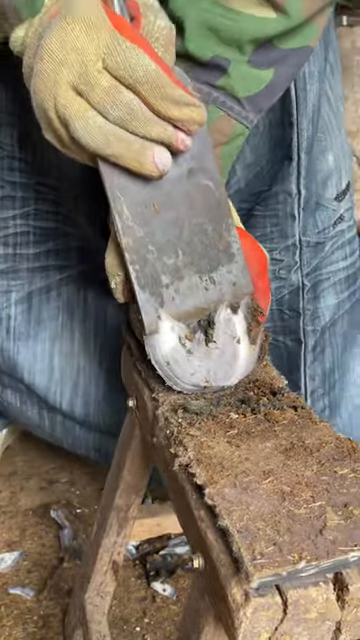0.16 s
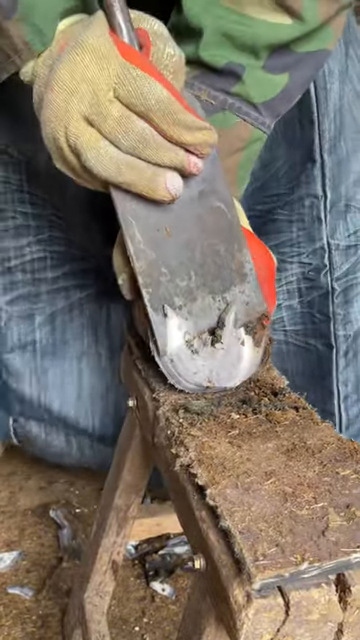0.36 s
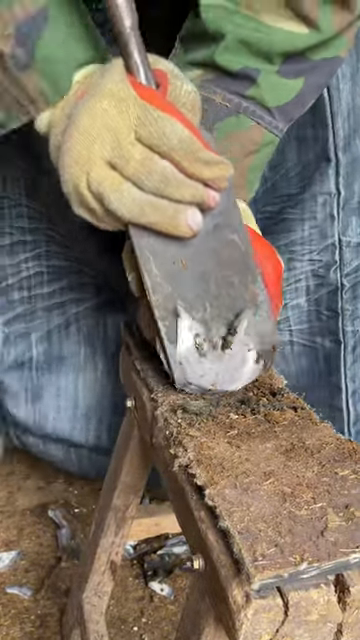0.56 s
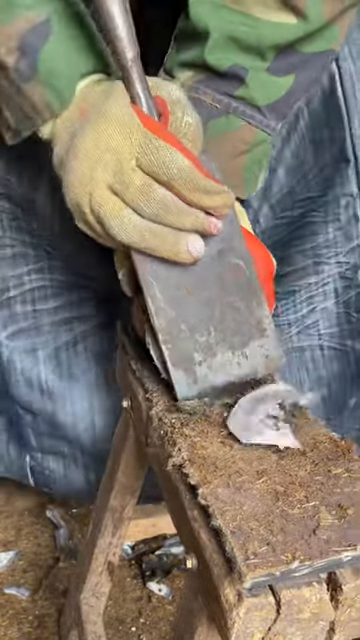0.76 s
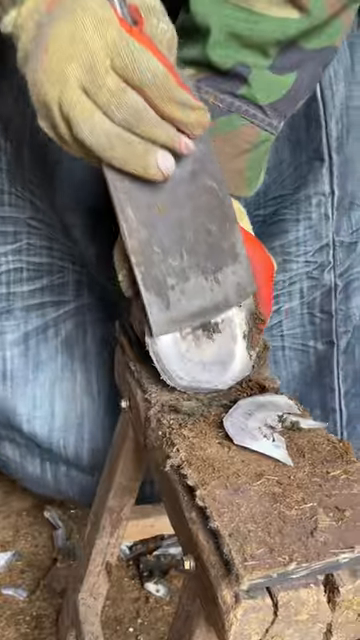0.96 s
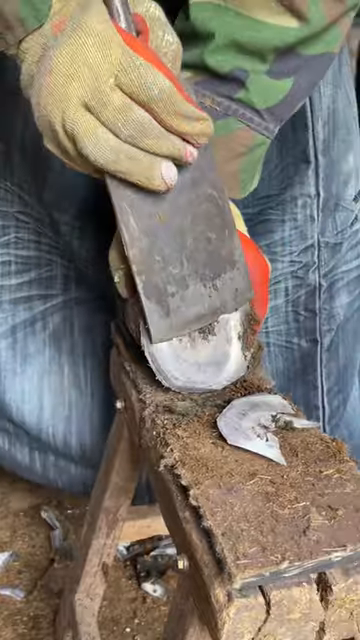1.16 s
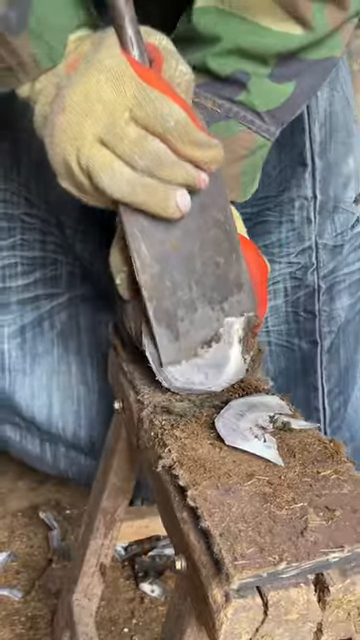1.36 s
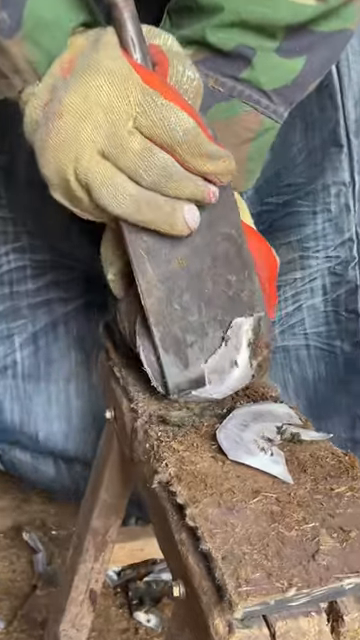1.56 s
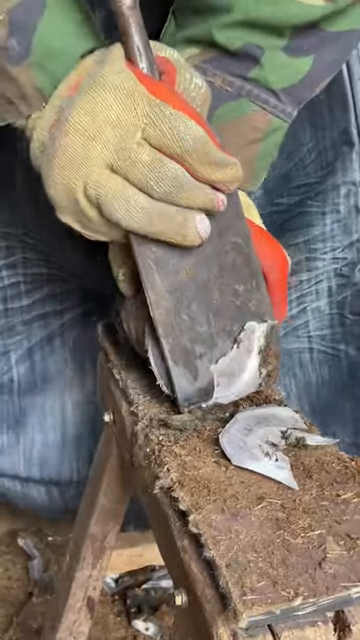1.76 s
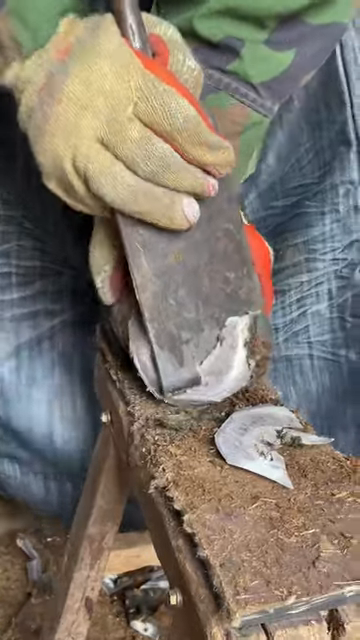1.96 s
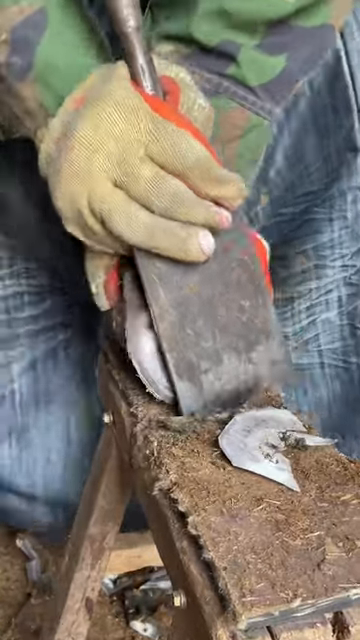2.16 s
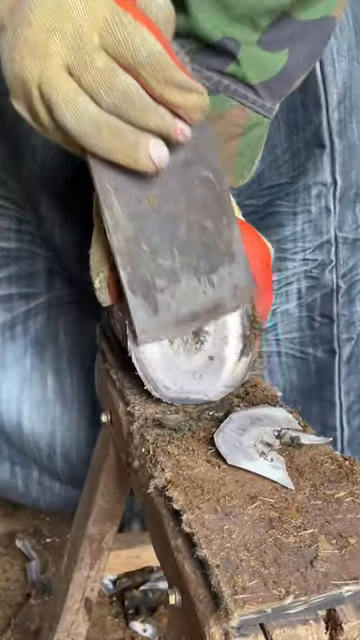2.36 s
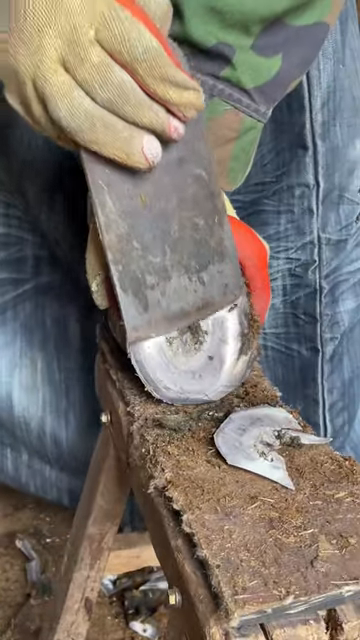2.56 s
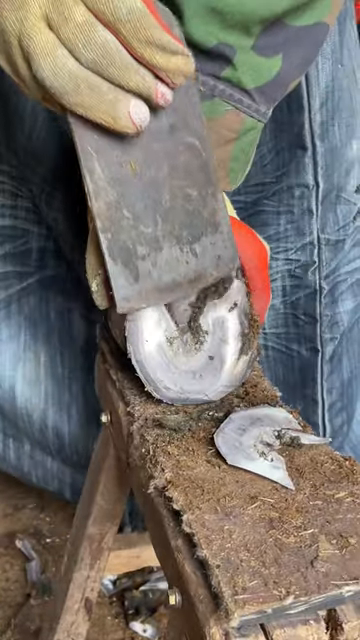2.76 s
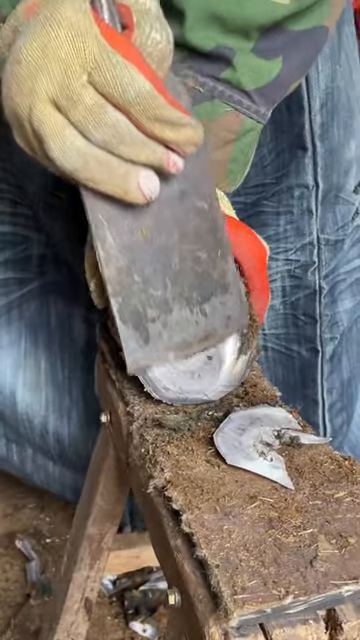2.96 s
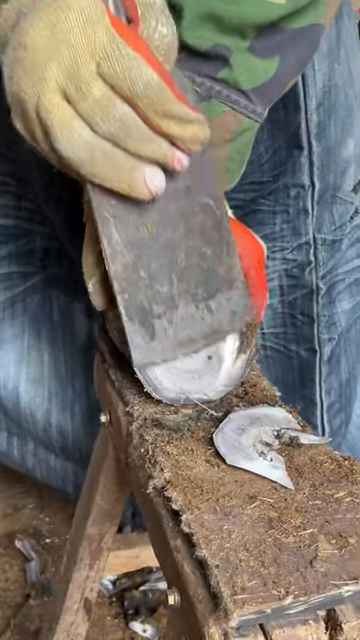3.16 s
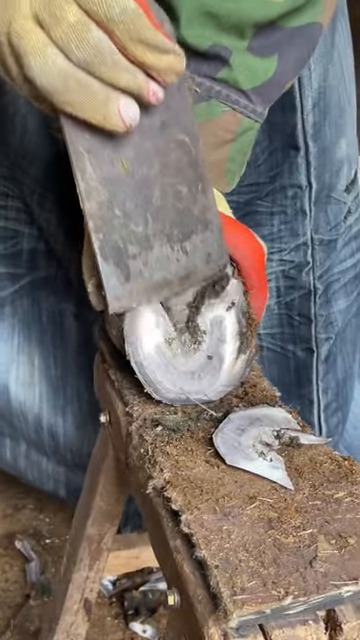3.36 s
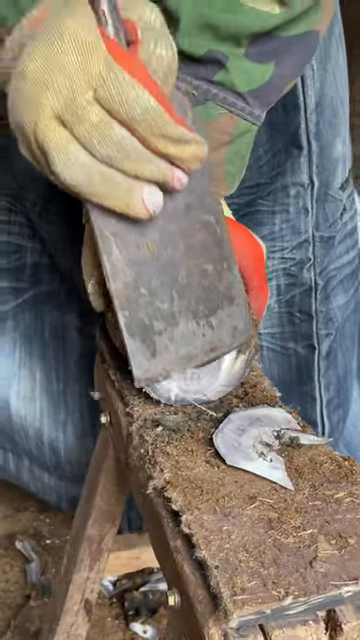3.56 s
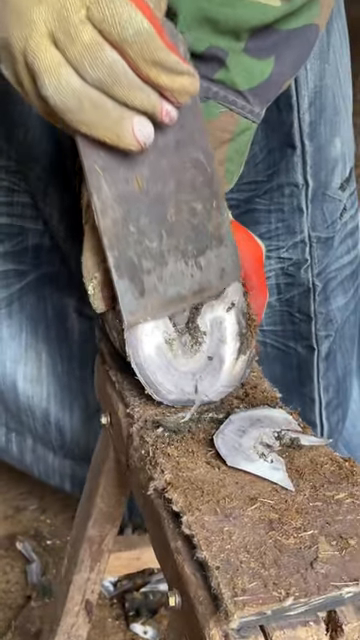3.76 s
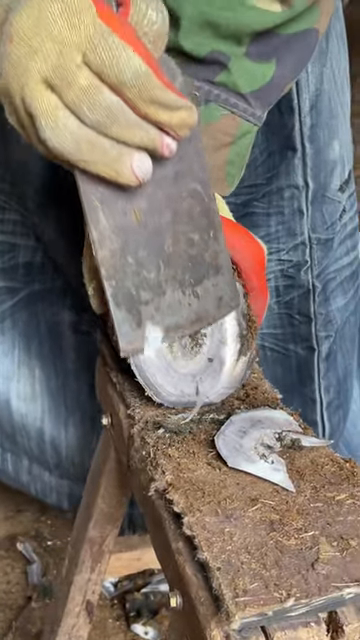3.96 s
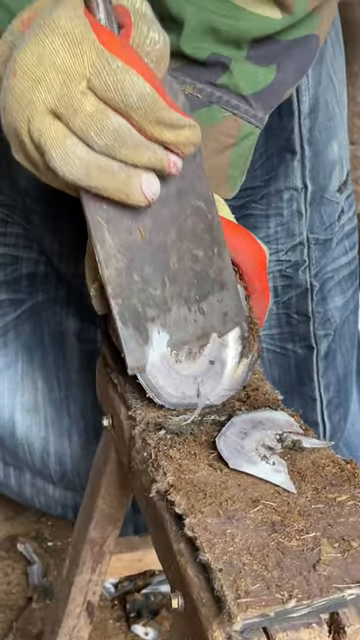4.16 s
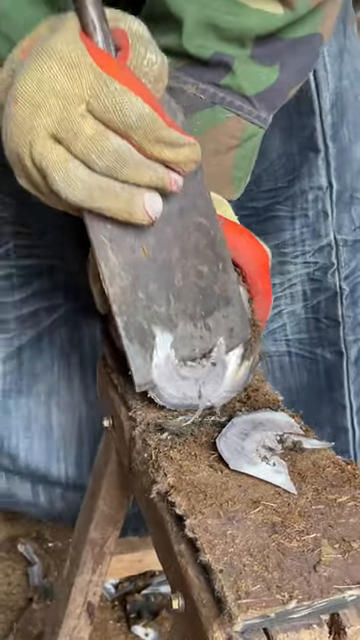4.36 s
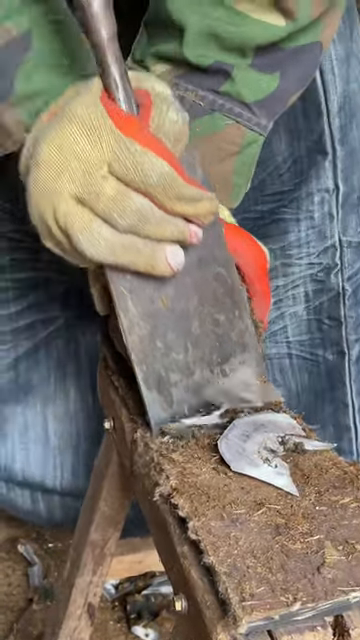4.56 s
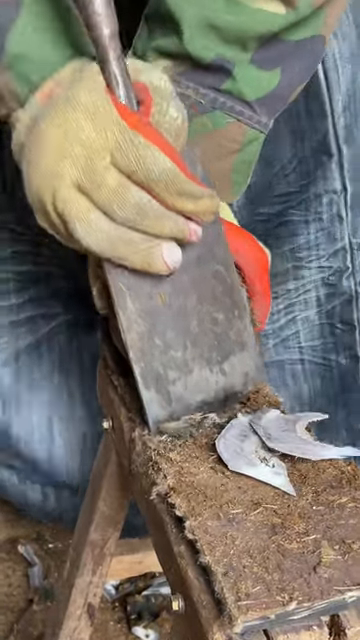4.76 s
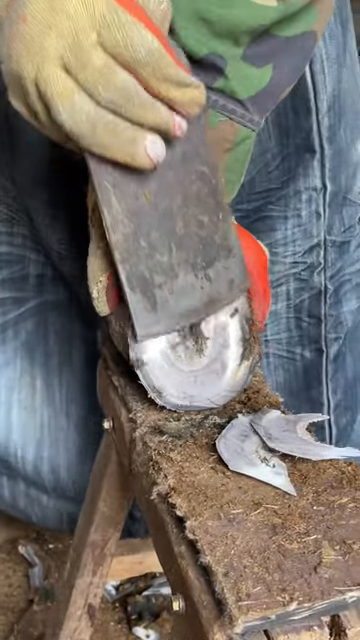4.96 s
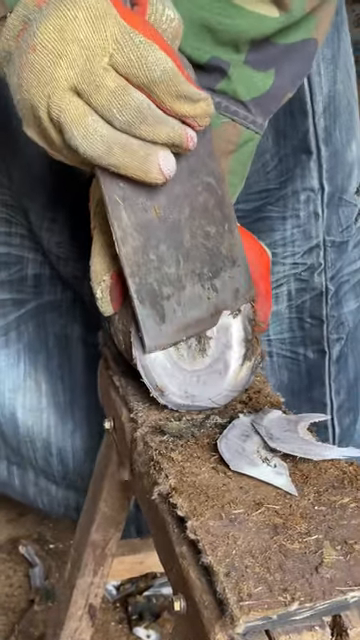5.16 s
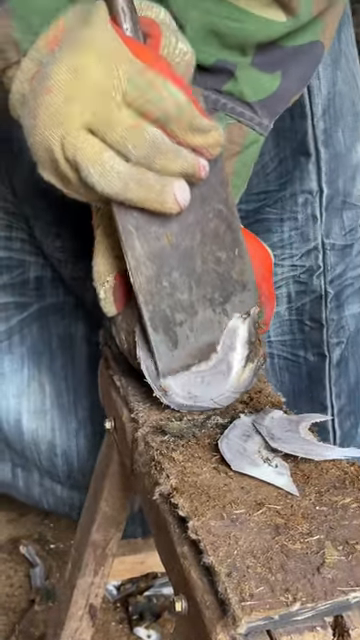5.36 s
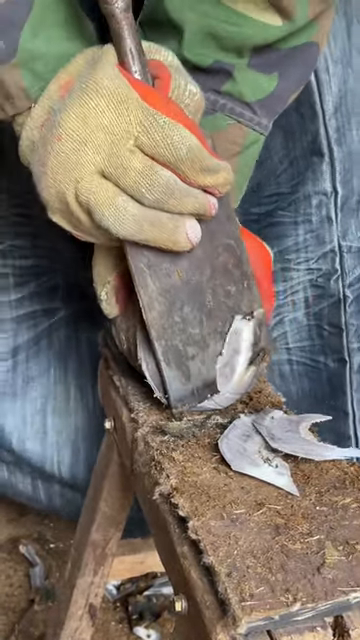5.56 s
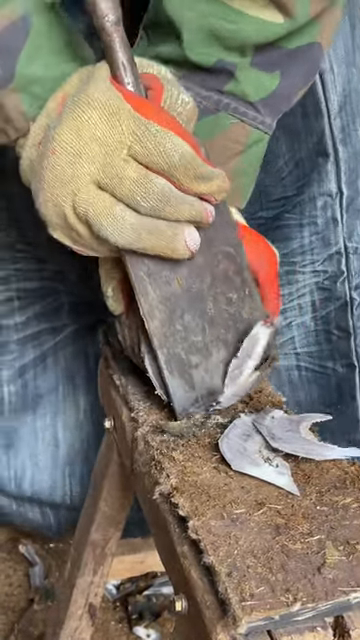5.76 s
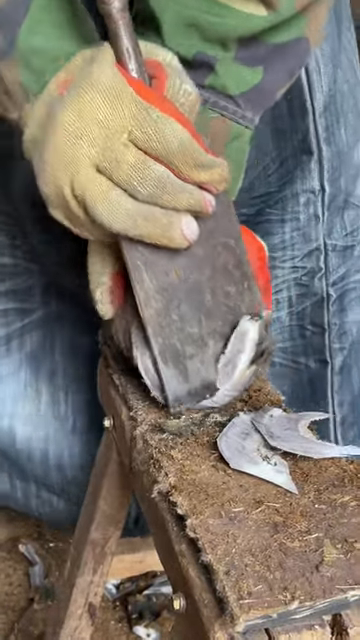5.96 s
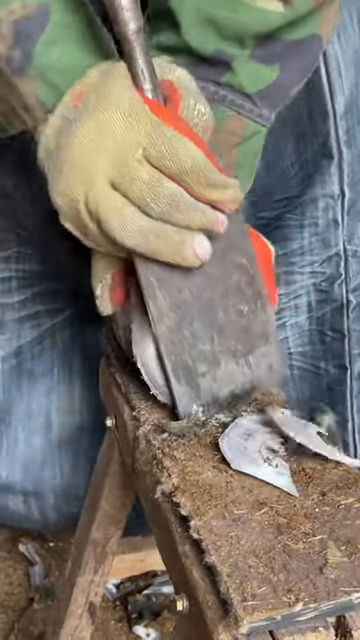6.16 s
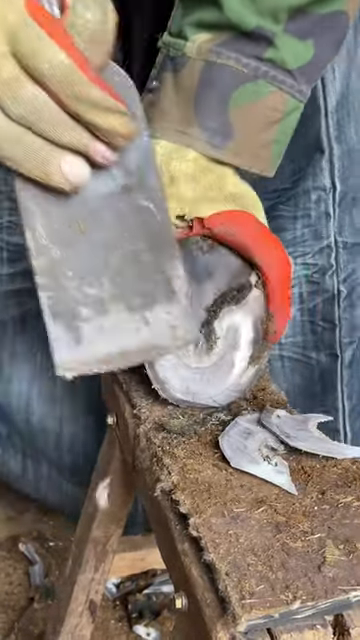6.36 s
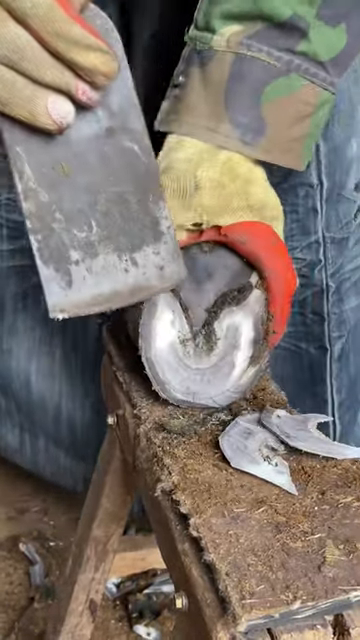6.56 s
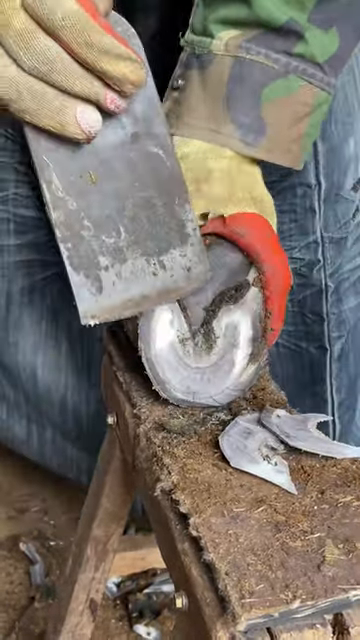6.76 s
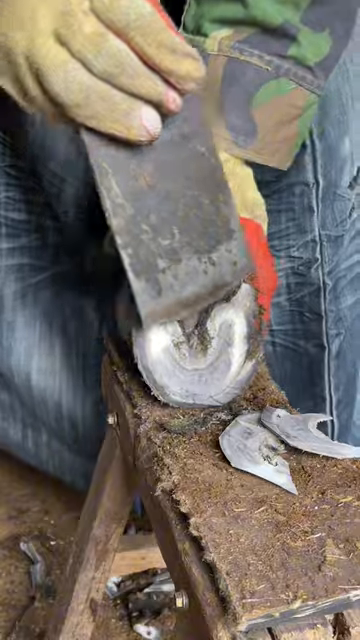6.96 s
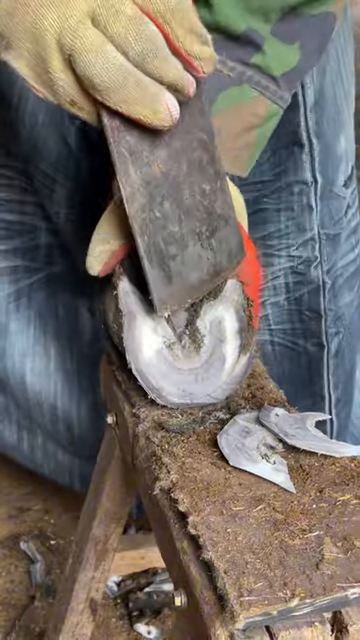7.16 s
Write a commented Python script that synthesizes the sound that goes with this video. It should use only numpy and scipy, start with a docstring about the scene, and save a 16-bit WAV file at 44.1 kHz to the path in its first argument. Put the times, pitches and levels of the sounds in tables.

```python
"""First come a low rumble, rustling work clothes and a blade that skims, clacks and knocks on a hoof.
The hoof rests on a wooden bench; the broad steel blade rasps through its horn, breaks out and chops.
Cuts, snaps and crumbs are bursts of tiny random fractures, most of them coloured by the blade's ringing.
Knocks, clacks and chops are short pushes into damped resonances, smeared so the low tones arrive late.
Cloth, dragging hoof and rumble are shaped noise; left-right phase offsets give the whole its width."""
import sys
import numpy as np
from scipy import signal
from scipy.fft import rfft, irfft, next_fast_len
from scipy.io import wavfile
from scipy.ndimage import uniform_filter1d, map_coordinates

SR = 44100
rng = np.random.default_rng(int(sys.argv[2]) if len(sys.argv) > 2 else 0)


def wrap_up_sound(samples):
    """Save the sound to the file named by the first command line argument, as 16-bit audio."""
    columns = np.atleast_2d(samples).T
    # keep every value between -1 and 1, then stretch to whole-number steps
    tamed = np.clip(columns, -1, 1)
    steps = np.round(tamed * 32767).astype(np.int16)
    wavfile.write(sys.argv[1], SR, steps)


N = 318402  # length in samples
# Levels in the tables are relative: each function adds its own fixed trim.


def amp(db):
    """Turn decibels into a plain multiplier."""
    return 10 ** (np.asarray(db) / 20)


def unit(x):
    """Scale a sound to an rms of 1."""
    return x / np.sqrt(np.mean(x ** 2) + 1e-20)


def hit_level(x):
    """Scale a hit to the energy of 5 ms at rms 1."""
    return x / np.sqrt(np.sum(x ** 2) / (0.005 * SR) + 1e-20)


def along(points, hz):
    """Read a curve of (frequency, value) points on a log frequency axis."""
    point_hz, value = np.transpose(points)
    return np.interp(np.log(hz + 1), np.log(point_hz + 1), value)


def wobble(rate):
    """A smooth random curve with rate random points a second."""
    points = rng.standard_normal(int(N * rate / SR) + 4)
    return map_coordinates(points, [np.arange(N) * rate / SR])


def filtered(x, response):
    """Multiply the spectrum of x by a complex response of frequency."""
    n = x.shape[-1]
    padded = next_fast_len(n + SR // 4)
    spectrum = rfft(x, padded) * response(np.fft.rfftfreq(padded, 1 / SR))
    return irfft(spectrum, padded)[..., :n]


def coloured(x, spectrum):
    """Shape x with a (frequency, dB) curve."""
    return filtered(x, lambda f: amp(along(spectrum, f)))


def modes(table, f):
    """Response of resonances (pitch_hz, width_hz, level_db), each of which rings after a push."""
    return sum(amp(db) * 1j * f * width / (hz * hz - f * f + 1j * f * width) for hz, width, db in table)


def gliding(x, hz, width_hz):
    """Pass x through a resonance whose pitch moves along hz, at rms 1."""
    turn = np.exp(2j * np.pi * np.cumsum(hz) / SR)
    pole = np.exp(-2 * np.pi * width_hz / SR)
    # shift the moving pitch down to zero, smooth twice, shift back up
    smooth = signal.lfilter([1], np.poly([pole, pole]), x * turn.conj())
    return unit(np.real(turn * smooth))


def bent(x, lag):
    """Bending waves are slower when lower: 100 Hz comes 0.9 lag seconds late, 10 kHz on time."""
    return filtered(x, lambda f: np.exp(-2j * np.pi * lag * (20 * np.sqrt(f) - f / 10)))


def blow(table, pitch=1, rough=0, length=0.01):
    """A sharp push and a random judder that fades over length seconds, into a set of resonances."""
    t = np.arange(SR // 4) / SR
    judder = rng.standard_normal(len(t)) * np.exp(-t / length)
    push = signal.unit_impulse(len(t)) + rough * judder / np.linalg.norm(judder)
    low_hz = table[0][0] / 2  # the sound thins out below this
    return hit_level(filtered(push, lambda f: modes(table, f / pitch) * 1j * f / (low_hz + 1j * f)))


def grit(n, rate, spread_db):
    """Tiny fractures of uneven size at random moments, rate a second, at rms 1."""
    chance, size, sign = rng.random(n), rng.standard_normal(n), rng.standard_normal(n)
    return unit((chance < rate / SR) * np.sign(sign) * amp(spread_db * np.clip(size, -2, 2)))


def patchy(x, depth_db, size=14):
    """Let the colour of x drift in patches a few hundred Hz wide, at rms 1."""
    z = signal.stft(x, nperseg=512)[2]
    field = uniform_filter1d(rng.standard_normal(z.shape), size=size // 2, axis=0)
    field = uniform_filter1d(field, size=size, axis=1)
    return unit(signal.istft(z * amp(depth_db * unit(field)), nperseg=512)[1][:N])


def add(track, s, x):
    """Mix x into the track at s seconds."""
    part = track[round(s * SR):][:len(x)]
    part += x[:len(part)]


def swell(s, half):
    """A smooth movement that grows and fades around s seconds."""
    return np.exp(-((np.arange(N) / SR - s) / half) ** 2)


def swells(rows):
    """The summed loudness curve of rows that start with middle_s, half_length_s, level_db."""
    return sum(amp(db) * swell(s, half) for s, half, db, *_ in rows)


# what the blade rings with: pitch_hz, width_hz, level_db
BLADE_RINGS = [(956, 79, 1.5), (1088, 110, 0), (1504, 135, 5.5), (1698, 160, 1.5), (2230, 130, 0.5),
               (2296, 35, 8.5), (2690, 530, -2.5), (3070, 72, -0.5), (3390, 117, 4), (4794, 350, 1),
               (5484, 180, 2), (6080, 130, -9.5), (7300, 58, -9), (7530, 830, -2), (8270, 270, 3),
               (9910, 130, 3.5), (10490, 160, 4)]


def steel(x, ring_db):
    """The sound x shakes the blade, and the blade's ringing joins it."""
    return filtered(x, lambda f: 1 + amp(ring_db) * modes(BLADE_RINGS, f))


# colour of the snap, a fracture's body: frequency_hz, level_db
SNAP_COLOUR = [(200, 9.5), (800, -7.5), (1900, -2.5), (3800, -3), (6000, -17.5), (12000, -78)]
# colour of the fizz, a fracture's treble: frequency_hz, level_db
FIZZ_COLOUR = [(1500, -67), (4000, -0.5), (6000, 1), (9500, 2), (12000, -20), (15500, -50)]


def fracture(snap_db, fizz_db, t60):
    """A burst of tiny breaks that dies by 60 dB in t60 seconds and rings the blade."""
    t = np.arange(SR // 4) / SR
    fade = amp(-60 * t / max(t60, 0.004)) * (1 - np.exp(-t / 0.00056))
    snap = coloured(grit(len(t), 7000, 4.6) * fade, SNAP_COLOUR)
    fizz = coloured(grit(len(t), 7600, 2.6) * fade, FIZZ_COLOUR)
    snap = hit_level(steel(snap, ring_db=-14.0))
    fizz = hit_level(steel(fizz, ring_db=1.5))
    return amp(snap_db - 8.5) * snap + amp(fizz_db - 4.5) * fizz


# the worker leans on the hoof, which loads the bench: middle_s, half_length_s, level_db
LEANS = [(0.47, 0.019, -52), (1.3, 0.17, -39.5), (2.19, 0.26, -51), (3.935, 0.048, -46.5),
         (4.18, 0.097, -42.5), (5.69, 0.036, -43.5), (6.62, 0.06, -46)]
# colour of the low background: frequency_hz, level_db
RUMBLE_COLOUR = [(20, -39), (35, -14.5), (52, 4.5), (80, 3), (120, -4), (200, -9.5), (320, -21.5),
                 (700, -98)]
# steady level, its slow drift, and the bench's share when leant on
RUMBLE_DB, RUMBLE_DRIFT_DB, LEAN_RUMBLE_DB = -43.5, 2, -0.5


def rumble():
    """Low noise, nearly alike in both channels, to which the loaded bench adds."""
    level = amp(RUMBLE_DB + RUMBLE_DRIFT_DB * wobble(3.04)) + amp(LEAN_RUMBLE_DB) * swells(LEANS)
    shared = rng.standard_normal(N)
    separate = rng.standard_normal((2, N))
    noise = shared + amp(-12.0) * separate
    return level * amp(wobble(10)) * unit(coloured(noise, RUMBLE_COLOUR))


# how long the surroundings answer: frequency_hz, time_to_fall_60_db_s
YARD_FADE = [(100, 0.2), (1500, 0.24), (6000, 0.14), (14000, 0.13)]


def yard(x):
    """A diffuse answer from the surroundings: fading noise, different in each channel."""
    hz, t, z = signal.stft(rng.standard_normal((2, SR // 2)), SR, nperseg=256)
    fade = amp(-60 * t / along(YARD_FADE, hz)[:, None])
    tail = signal.istft(z * fade, SR, nperseg=256)[1]
    return signal.fftconvolve(x[None], tail / np.linalg.norm(tail[0]), axes=1)[:, :N]


# the arm swings and its sleeve swishes:
# middle_s, half_length_s, level_db, swish_pitch_hz, glide_octaves_per_s
SWINGS = [(0.18, 0.15, -58.5, 3800, 0.5), (0.924, 0.088, -54.5, 2870, -1.5), (1.255, 0.075, -52, 2970, 0),
          (1.718, 0.1, -54.5, 3230, -1), (2.195, 0.16, -55, 3420, 5), (3.146, 0.012, -58.5, 6250, -6),
          (3.207, 0.04, -58.5, 3770, -4), (3.88, 0.023, -56.5, 3920, -7), (4.007, 0.13, -63, 3700, 5),
          (4.67, 0.12, -52, 2970, 0), (5.36, 0.15, -56, 2520, 1), (6.15, 0.13, -53.5, 3240, -1),
          (6.668, 0.17, -57.5, 2930, -0.5), (7.113, 0.11, -57, 1500, -0.5)]
# colour of rubbing cloth: frequency_hz, level_db
CLOTH_COLOUR = [(300, -1), (1000, -1.5), (1800, 1.5), (3200, -2), (4500, -3.5), (8000, -3.5), (10000, -7),
                (11300, -22), (12300, -46), (15000, -51.5)]
CLOTH_REST_DB = -62  # the clothes never quite stop moving
# the weave's note: level, width as a share of its pitch, unsteadiness in octaves
SWISH_DB, SWISH_WIDTH, SWISH_WAVER_OCT = -6, 0.21, 0.097


def sleeves():
    """Cloth rubs all the time; in a swing the ribs of its weave add a swish that may glide in pitch."""
    t, rubbing = np.arange(N) / SR, grit(N, 9000, 2.6)
    cloth = patchy(coloured(rubbing, CLOTH_COLOUR), depth_db=4.0) * amp(0.74 * wobble(25))
    out = (amp(CLOTH_REST_DB) + amp(-3.5) * swells(SWINGS)) * cloth
    waver = SWISH_WAVER_OCT * wobble(14)
    for s, half, db, hz, glide in SWINGS:
        pitch = hz * 2 ** (glide * np.clip(t - s, -2 * half, 2 * half) + waver)
        swish = gliding(rubbing, pitch, SWISH_WIDTH * hz)
        out = out + amp(db + SWISH_DB) * swell(s, half) * swish
    return amp(3.5) * out


# colour of the hoof dragging on wood: frequency_hz, level_db
DRAG_COLOUR = [(100, 4), (270, 5), (450, -1), (700, -7.5), (1500, -14), (4000, -47)]
DRAG_REST_DB = -55.5  # the hoof creeps even when only held
# after each blow the hoof rocks: level relative to that blow's table level, rise and settling times
ROCK_DB, ROCK_RISE_S, ROCK_SETTLE_S = -27.5, 0.029, 0.091


def hoof():
    """The hoof drags grainily on the bench when leant on, and rocks to rest after every chop and knock."""
    t = np.arange(N) / SR
    motion = amp(DRAG_REST_DB) + swells(LEANS)
    for s, db, *_ in CHOPS + KNOCKS:
        since = np.maximum(t - s, 0)
        rocking = (1 - np.exp(-since / ROCK_RISE_S)) * np.exp(-since / ROCK_SETTLE_S)
        motion = motion + amp(db + ROCK_DB) * rocking
    grains = unit(coloured(grit(N, 700, 2.36), DRAG_COLOUR))
    return amp(-3.5) * motion * grains * amp(2.5 * wobble(70))


# loose crumbs of horn tick against the steel: time_s, level_db
CRUMBS = [(1.0096, -44), (1.0854, -48), (1.961, -35.5), (2.3191, -36.5), (3.1155, -44.5), (3.6501, -46.5),
          (4.1485, -36), (4.32, -46), (4.6473, -35.5), (4.8546, -36), (4.9262, -46), (5.9214, -40.5),
          (5.948, -39), (6.333, -35), (6.3995, -38)]
# a tick's body and treble relative to its level, and its 60 dB fade
CRUMB_SNAP_DB, CRUMB_FIZZ_DB, CRUMB_T60_S = -2.5, -1, 0.028


def crumbs():
    """Loose crumbs of horn tick against the blade, each a small burst of fractures."""
    out = np.zeros(N)
    for s, db in CRUMBS:
        add(out, s, fracture(db + CRUMB_SNAP_DB, db + CRUMB_FIZZ_DB, CRUMB_T60_S))
    return out


# the edge skims lightly over the sole: middle_s, half_length_s, level_db
SKIMS = [(0.016, 0.044, -51), (0.891, 0.062, -45.5), (2.312, 0.14, -53), (2.79, 0.13, -56.5),
         (2.965, 0.072, -47), (3.205, .035, -52.5), (3.315, 0.024, -52), (3.506, 0.076, -46),
         (3.738, 0.053, -49), (3.96, 0.043, -44), (4.163, 0.093, -47.5), (4.894, 0.084, -51),
         (5.083, 0.084, -53.5), (6.778, 0.11, -50)]
# colour of the light scrape: frequency_hz, level_db
SKIM_COLOUR = [(300, 17), (900, -5), (2000, 0.5), (4200, -7), (6500, 2), (9500, -8.5), (11000, -12.5),
               (12500, -46), (15500, -37)]


def skims():
    """Barely pressed, the blade is less damped, so its resonances stand out of the scrape."""
    scrape = coloured(grit(N, 6000, 6.0) * amp(3.1 * wobble(59)), SKIM_COLOUR)
    ringing = steel(steel(scrape, ring_db=0.5), ring_db=2.0)  # twice, so the rings stand out
    return swells(SKIMS) * patchy(ringing, depth_db=2.0)


# the lifted blade is tapped: time_s, click_db, ring_db
TAPS = [(0.857, -29, -60), (4.1006, -23, -57), (6.499, -17.5, -22.5), (6.7204, -35, -33),
        (6.997, -40.5, -39)]
# high tones of the blade once it is off the horn: pitch_hz, level_db
FREE_BLADE = [(3709, -6), (7090, -4), (8950, 0.5), (9868, -2), (11450, -7.5)]
FREE_WIDTH_HZ = 72
TAP_FIZZ_DB, TAP_T60_S = 0.5, 0.023  # the click's treble relative to its body, and its 60 dB fade


def taps():
    """A gritty click; off the hoof the blade also rings freely in its high tones."""
    out = np.zeros(N)
    free_rings = [(hz, FREE_WIDTH_HZ, db) for hz, db in FREE_BLADE]
    for s, click_db, ring_db in TAPS:
        ring = blow(free_rings, rough=1.0, length=0.012)
        ring = filtered(ring, lambda f: 1 / (1 + (f / 13000) ** 12))
        click = fracture(click_db, click_db + TAP_FIZZ_DB, TAP_T60_S)
        add(out, s, amp(ring_db) * ring + click)
    return out


# the pressed blade slips: time_s, level_db, pitch_ratio (1 is the usual pitch)
SLIPS = [(0.133, -30, 0.94), (0.141, -25.5, 0.98), (0.154, -34, 0.83), (0.165, -35, 0.97), (0.19, -31, 1),
         (0.213, -27, 0.96), (0.251, -24.5, 1), (0.511, -19, 1.02), (1.702, -40, 1.03),
         (2.009, -21.5, 1.14), (2.026, -32, 1.4), (2.24, -27, 0.95), (4.16, -31, 1.23),
         (4.235, -32.5, 1.17), (6.172, -31, 0.98), (6.313, -33.5, 0.94), (6.352, -24.5, 0.96),
         (6.604, -30, 1.2), (6.619, -24.5, 0.73), (6.645, -33.5, .9), (6.726, -36, 0.91),
         (6.749, -33, 0.84)]
# resonances of the hollow clack at its usual pitch: pitch_hz, width_hz, level_db
CLACK_RINGS = [(884, 84, 8), (1726, 260, 9.5), (3950, 360, -4.5)]


def slips():
    """The edge sticks and slips, each hollow clack at its own pitch."""
    out = np.zeros(N)
    for s, db, pitch in SLIPS:
        clack = blow(CLACK_RINGS, pitch=pitch, rough=0.95, length=0.0039)
        add(out, s, amp(db - 9.0) * bent(clack, lag=0.0053))
    return filtered(out, lambda f: 1 / (1 + (f / 9000) ** 6))


# horn fibres snap: time_s, snap_db, fizz_db, time_to_fall_60_db_s
SNAPS = [(0.2064, -25.5, -32, .03), (0.5101, -24.5, -26.5, 0.016), (0.602, -30, -24.5, 0.018),
         (0.6286, -22, -22, 0.0065), (1.51, -28.5, -31.5, 0.027), (1.666, -20, -25.5, 0.037),
         (1.681, -38, -31, 0.012), (1.689, -25, -32, .015), (1.8088, -35, -36, 0.017),
         (1.998, -23.5, -25, 0.015), (2.009, -24, -29, 0.03), (2.0264, -15, -26, 0.027),
         (2.2311, -29.5, -34, 0.015), (2.4102, -34.5, -39.5, 0.02), (2.478, -32.5, -43, 0.091),
         (3.5041, -31.5, -39, 0.021), (4.4618, -33, -39.5, 0.068), (4.556, -20.5, -17.5, 0.016),
         (4.569, -30, -44, 0.011), (5.415, -31, -27.5, 0.018), (5.436, -30.5, -50, .02),
         (5.643, -33, -34.5, 0.039), (5.7914, -32, -36.5, 0.025), (6.031, -25, -18, 0.0081),
         (6.0697, -25.5, -31.5, 0.054), (6.507, -27.5, -41, 0.018), (6.6251, -28, -27, 0.015),
         (6.746, -36, -30, 0.032)]
# grit crushed by each knock: levels relative to the knock's table level, and the 60 dB fade
SCUFF_SNAP_DB, SCUFF_FIZZ_DB, SCUFF_T60_S = -12.5, -22.5, 0.12


def snaps():
    """Horn fibres snap under the edge, and every knock crushes a little grit."""
    out = np.zeros(N)
    for s, snap_db, fizz_db, t60 in SNAPS:
        add(out, s, fracture(snap_db, fizz_db, t60))
    for s, db, *_ in KNOCKS:
        add(out, s, fracture(db + SCUFF_SNAP_DB, db + SCUFF_FIZZ_DB, SCUFF_T60_S))
    return out


# the blade is set down on the hoof, bounces or catches in it:
# time_s, level_db, pitch_hz, judder (0 to 1)
KNOCKS = [(0.186, -31, 504, 0.8), (1.076, -15, 290, 0.3), (1.101, -29.5, 327, 0.8),
          (1.435, -28.5, 414, 0.74), (1.444, -29, 570, 0.4), (1.702, -25, 730, 0.13),
          (2.309, -24.5, 286, 0.9), (4.157, -26.5, 306, 0.4), (5.136, -35, 750, 0.4),
          (5.142, -34, 336, 0.3), (5.208, -25, 500, 0.5), (5.21, -16, 285, 0.1), (5.26, -36.5, 336, 0.6),
          (6.498, -24, 387, 0.4), (6.602, -32, 304, 0.7), (6.623, -30.5, 330, 1), (6.644, -33, 396, 0.5),
          (6.659, -29.5, 332, 0.7), (6.681, -41.5, 604, .6)]


def knocks():
    """The hoof answers a soft push with one heavily damped, falling note, and the blade judders on it."""
    out = np.zeros(N)
    for s, db, hz, judder in KNOCKS:
        note = blow([(hz, 0.36 * hz, 0)], rough=judder, length=0.017)
        note = filtered(note, lambda f: modes([(hz, 1.22 * hz, 0)], f))
        soft = filtered(note, lambda f: 1 / (1 + 1j * f / (0.5 * hz)))
        # the small hoof radiates little below its note
        soft = filtered(soft, lambda f: f ** 4 / (f ** 4 + (0.51 * hz) ** 4))
        add(out, s - 0.002, amp(db - 3.5) * hit_level(bent(soft, lag=0.01105)))
    return out


BITE_S, RELEASE_S = 0.022, 0.039  # the edge enters and leaves the horn


def stroke(start, end, level_db):
    """The push of one stroke: the edge bites, follows its level, and leaves."""
    t, lead = np.arange(N) / SR, 0.005
    bite = np.clip((t - start + lead) / BITE_S, 0, 1)
    release = np.clip(1 - (t - end + lead) / RELEASE_S, 0, 1)
    return amp(level_db) * bite * release


# deep slices, in which the push builds until the horn gives:
# start_s, end_s, final_level_db, build_db, slice_pitch_hz
SLICES = [(0.5, 0.622, -31.5, 7.5, 2100), (1.319, 1.411, -34, 7.5, 1810), (1.662, 1.68, -45, 3, 2400),
          (1.987, 2.055, -39, 1.5, 1830), (4.474, 4.544, -32.5, 10, 1810), (5.345, 5.41, -32.5, 10.5, 1970),
          (5.993, 6.026, -35.5, 6, 2100)]
# shallow scrapes, which bite at once and ease off: start_s, end_s, first_level_db, pitch_hz
SCRAPES = [(0.173, 0.24, -42, 1710), (2.221, 2.278, -42.5, 1700), (4.135, 4.247, -42, 1530),
           (5.656, 5.72, -43, 1920), (6.551, 6.637, -40, 2870), (6.722, 6.766, -40.5, 1630)]
# colour of horn being cut: frequency_hz, level_db
RASP_COLOUR = [(150, 2.5), (600, -2), (2000, -2.5), (4000, -5.5), (7000, -3), (10000, -3), (12500, -20.5),
               (15500, -37)]
BUILD_S, EASE_DB_PER_S = 0.052, 47
COARSE_DB = -4  # single thick fibres crack among the fine fractures
# ring of the lifting slice: level, width as a share of its pitch, rise as the edge advances
CURL_DB, CURL_WIDTH, CURL_RISE_OCT_PER_S = -15, 0.35, 3.8


def slices():
    """The edge rasps through horn: dense fractures ring the curling slice and brighten with the push."""
    t, push, curl = np.arange(N) / SR, np.zeros(N), np.zeros(N)
    fine, coarse = grit(N, 5000, 4.0), grit(N, 300, 3)
    fractures = unit(fine * amp(1.65 * wobble(220)) + amp(COARSE_DB) * coarse)
    strokes = []
    for start, end, db, build_db, hz in SLICES:
        still_to_build = np.clip((end - t) / BUILD_S, 0, 1)
        strokes.append((start, end, db - build_db * still_to_build, hz))
    for start, end, db, hz in SCRAPES:
        strokes.append((start, end, db - EASE_DB_PER_S * np.maximum(t - start, 0), hz))
    for start, end, level_db, hz in strokes:
        force = stroke(start, end, level_db)
        pitch = hz * 2 ** (CURL_RISE_OCT_PER_S * (np.clip(t, start, end) - (start + end) / 2))
        push += force
        curl += force * gliding(fractures, pitch, CURL_WIDTH * hz)
    rasp = patchy(steel(coloured(fractures, RASP_COLOUR), ring_db=-13), depth_db=3.5, size=6)
    dull = filtered(rasp, lambda f: 1 / (1 + (f / 3500) ** 2))
    brightness = (push / amp(-38.5)) ** 0.78  # a harder push lets more treble through
    return amp(1.5) * push * (dull + brightness * (rasp - dull)) + amp(CURL_DB) * curl


# the blade breaks through the horn and jars the bench:
# time_s, crack_db, knock_db, thud_db, crack_length_s, bass_lag_s, crack_tilt_db_per_octave,
# slice_pitch_hz, travel_to_bench_s
CHOPS = [(0.6183, -17, -24, -16.5, 0.007, .015, 3, 1150, 0.0052),
         (1.701, -36, -32, -26.5, 0.005, 0.0091, 3.5, 700, .001),
         (2.0503, -13.5, -13.5, -16, 0.0066, .015, -2, 1770, 0.0029),
         (4.557, -23, -31, -19.5, 0.0083, .014, 0, 1120, 0.00222),
         (6.0163, -16.5, -12, -13.5, 0.011, 0.01058, 0, 980, .0055)]
# colour of the tearing horn before its tilt: frequency_hz, level_db
CRACK_COLOUR = [(50, -43), (300, 0), (700, -17), (1120, 8), (1700, -4), (4000, -2), (6500, -1), (9700, -6),
                (12000, -17.5), (15500, -23)]
# the bench's low tones: pitch_hz, width_hz, level_db
THUD_RINGS = [(80, 23, 3.5), (113.5, 37.5, 5.5)]
# the bench's upper tones: pitch_hz, width_hz, level_db
PLANK_RINGS = [(237, 75, 7), (313, 49, -8), (428, 49, 5.5), (900, 180, -8.5), (1500, 160, -6.5),
               (1750, 130, -3.5), (2070, 110, -5)]
SLICE_RING_DB = -4  # the freed slice colours its own crack


def chops():
    """The last horn tears in a short crack, then the blade lands and drives a bending wave into the bench."""
    out, t, lead = np.zeros(N), np.arange(SR // 4) / SR, 0.004
    for s, crack_db, knock_db, thud_db, length, lag, tilt_db, hz, travel in CHOPS:
        # the tear gathers over a few milliseconds, then lets go
        after = np.maximum(t - lead, 0)
        letting_go = np.exp(-(after / length) ** 2) + amp(-14 - 60 * after / 0.06)
        tear = grit(len(t), 9000, 0.84) * np.minimum(t / lead, 1) ** 4 * letting_go
        tear = filtered(tear, lambda f: amp(along(CRACK_COLOUR, f) + tilt_db * np.log2(1 + f / 1000)))
        # the slice radiates little below its own pitch, and rings at it
        slice_ring = [(hz, 0.41 * hz, SLICE_RING_DB)]
        tear = filtered(tear, lambda f: f ** 2 / (f ** 2 + (0.73 * hz) ** 2) + modes(slice_ring, f))
        crack = hit_level(steel(tear, ring_db=10.0))
        add(out, s - lead, amp(crack_db + 2.0) * bent(crack, lag))
        # one clean shove rings the bench
        plank = blow(PLANK_RINGS, rough=0.2, length=0.008)
        thud = blow(THUD_RINGS, rough=0.1, length=0.01)
        knock = amp(knock_db) * filtered(plank, lambda f: 1 / (1 + (f / 2600) ** 4))
        add(out, s + travel, bent(knock + amp(thud_db + 2.5) * thud, lag))
    return out


def scene():
    """All the work sounds together, over the rumble and the answer of the surroundings."""
    background = sleeves() + hoof() + crumbs()
    cutting = skims() + taps() + slips() + snaps() + slices()
    work = background + cutting + knocks() + chops()
    return work + rumble() + amp(-16.0) * yard(work)


# left-right phase offset, which gives the sound its stereo width: frequency_hz, offset_radians
PHASE_OFFSET = [(100, 0), (1400, 0), (2400, .45), (4000, .7), (4550, 1.5), (4900, 3.2), (5350, 5.8),
                (6600, 6.7), (7200, 7.8), (8550, 9.25), (9400, 9.55), (10000, 10.1), (11000, 11),
                (11600, 12.3), (13500, 12.7), (15000, 15.6)]
# left level minus right level: frequency_hz, difference_db
LEVEL_OFFSET = [(60, -1), (200, -3.5), (380, -5.5), (600, -7.5), (1000, -5.5), (1600, 0)]
TOP_HZ = 15800  # nothing above this passes


def record(dry):
    """Left-right phase and level offsets by frequency give stereo width; the highest treble is cut."""
    sides = np.array([[0.5], [-0.5]])  # half of each offset goes to either side

    def widen(f):
        level = amp(sides * along(LEVEL_OFFSET, f))
        return level * np.exp(1j * sides * along(PHASE_OFFSET, f))

    wide = filtered(dry, widen)
    return filtered(wide, lambda f: f < TOP_HZ)


dry = scene()
out = record(dry)
wrap_up_sound(out)
```